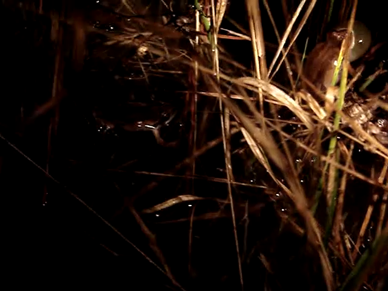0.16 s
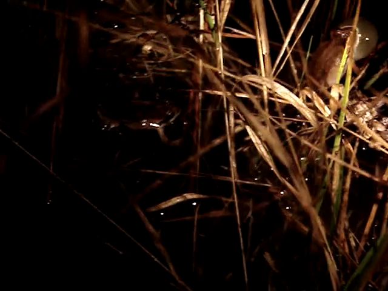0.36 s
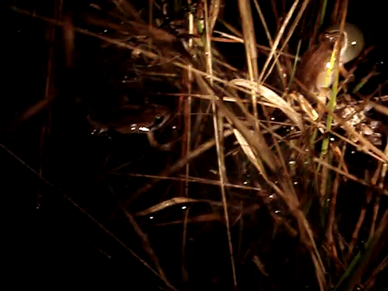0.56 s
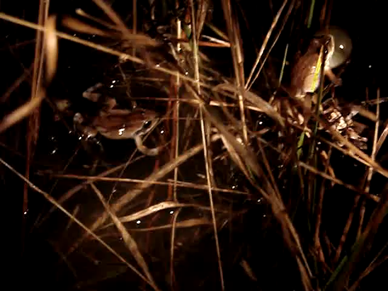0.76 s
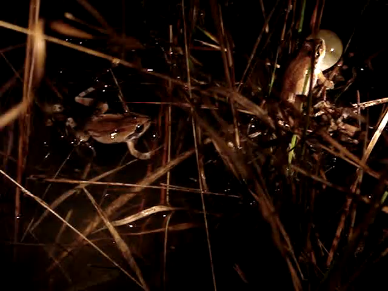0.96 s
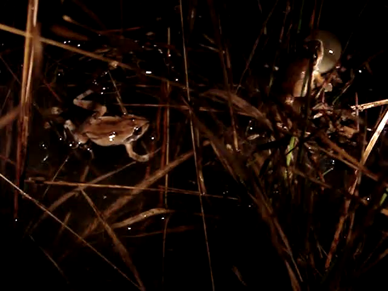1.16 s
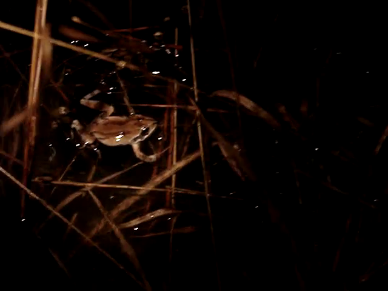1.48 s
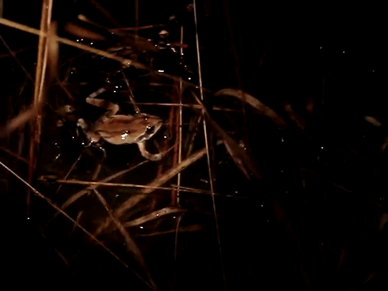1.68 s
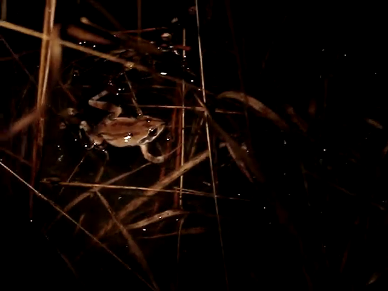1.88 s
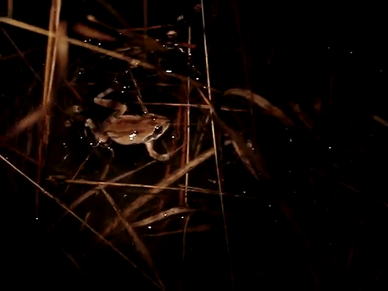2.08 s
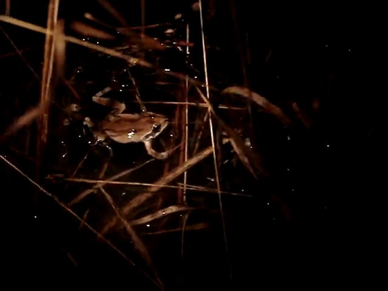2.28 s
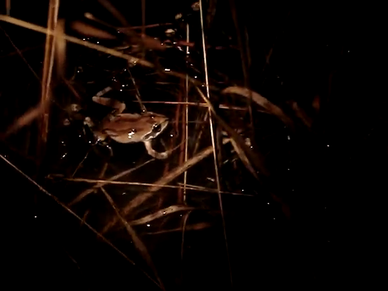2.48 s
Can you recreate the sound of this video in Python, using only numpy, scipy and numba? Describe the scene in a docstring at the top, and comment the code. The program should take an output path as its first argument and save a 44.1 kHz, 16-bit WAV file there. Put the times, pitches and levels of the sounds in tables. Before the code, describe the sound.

Small frogs peep close by in a night marsh. One gives a bright, rising peep at the start; another answers with a flat, pure peep at 0.3 seconds. From 0.3 to 0.9 seconds the nearest frog rattles a climbing trill with soft low thumps underneath. Then raspy clicks thicken and the two keep alternating, each about three times a second, until 2.6 seconds, over distant frogs and faint hiss.

```python
"""A night marsh full of small frogs, close to the microphone. It opens on a bright, rising peep over
clicks, far peeps, a faint patter of distant calls and hiss. At about 0.3 s a second near frog answers
with a flat, pure peep, and the nearest rattles a slow, climbing trill with low thumps under it.
The trill stops at 0.9 s; the clicks thicken again and the two near frogs trade peeps to the end."""
import sys
import numpy as np
from scipy import signal
from scipy.fft import rfft, irfft
from scipy.io import wavfile
from scipy.ndimage import uniform_filter1d, minimum_filter1d
from numba import njit

SR = 44100
rng = np.random.default_rng(int(sys.argv[2]) if len(sys.argv) > 2 else 0)


def digitize_waveform(pressure):
    """Quantize a signal to 16-bit integers and store it at the path in sys.argv[1].

    Rows of a 2-D input are taken as channels; values are limited to [-1, 1].
    """
    field = np.atleast_2d(pressure).T
    bounded = np.clip(field, -1, 1)
    quanta = np.round(bounded * 32767).astype(np.int16)
    wavfile.write(sys.argv[1], SR, quanta)


N = 116865

# the nearest frog's trill (time [s], level [dB], second harmonic [Hz], first harmonic trim [dB])
TRILL_PULSES = [(0.2683, -10.9, 2956, -17), (0.3149, -10.5, 3029, -16), (0.3718, -8.2, 3031, -19),
                (0.4345, -7.4, 3032, -22), (0.5, -6.4, 3084, -22), (0.5685, -6.5, 3138, -22),
                (0.6379, -6.9, 3138, -23), (0.7099, -6.0, 3190, -24), (0.7791, -7.6, 3236, -22),
                (0.8437, -7.5, 3268, -20), (0.9018, -7.2, 3337, -20)]
# timbre of a click, harmonics 1-7 (level [dB])
CLICK_VOICE = [2.5, .7, -23, -38, -45, -52, -57]
# timbre of a far peep, harmonics 1-7 (level [dB])
FAR_VOICE = [-27, 0, -27, -44, -52, -58, -62]
CLICK_SHAPE = dict(attack_s=.0016, release_s=.004, bend=.03, glide_s=.002,
                   sag_db=-5, bright_db=4, waver_db=1.8, rasp=.75)
FAR_SHAPE = dict(attack_s=.004, release_s=.005, bend=-.04, glide_s=.006,
                 sag_db=-.5, bright_db=2.5, waver_db=2.2, rasp=.5)


def rising_frog():
    """A near frog scoops up to pitch, with a bright edge on each peep."""
    # peeps (time [s], length [s], level [dB], second harmonic [Hz])
    notes = [(.0424, .0217, -8, 2786), (.4405, .0245, -8.5, 2779), (.8603, .0247, -11.8, 2770),
             (1.2275, .0246, -8, 2771), (1.553, .0247, -8, 2783), (1.8473, .0238, -7.7, 2781),
             (2.0961, .0219, -7.8, 2787), (2.427, .022, -8.5, 2774)]
    # timbre, harmonics 1-7 (level [dB])
    voice = [-25, 1.3, -23, -32, -35, -39, -47]
    shape = dict(attack_s=.0095, release_s=.007, bend=-.15, glide_s=.0036,
                 sag_db=-1.5, bright_db=22, waver_db=.8, rasp=.45)
    return peeps(notes, voice, shape)


def flat_frog():
    """A second near frog holds its pitch, almost a pure tone."""
    # peeps (time [s], length [s], level [dB], second harmonic [Hz])
    notes = [(.3025, .0225, -8, 2690), (.641, .0206, -13.2, 2687), (.972, .022, -10.3, 2681),
             (1.3238, .0226, -8.5, 2686), (1.658, .0221, -6.7, 2679), (1.9646, .0235, -7, 2678),
             (2.3633, .0245, -7.6, 2674), (2.6371, .02, -25, 2742)]
    # timbre, harmonics 1-7 (level [dB])
    voice = [-31, 1.2, -39, -46, -60, -64, -66]
    shape = dict(attack_s=.004, release_s=.006, bend=.005, glide_s=.003,
                 sag_db=-2.5, bright_db=8, waver_db=.6, rasp=.3)
    return peeps(notes, voice, shape)


def trilling_frog():
    """The nearest frog rattles out hard-edged pulses that climb in pitch."""
    # timbre, harmonics 1-7 (level [dB])
    voice = [8, 9, -15, -30, -38, -44, -47]
    shape = dict(attack_s=.0005, release_s=.004, bend=-.002, glide_s=.0012,
                 sag_db=-8, bright_db=8, waver_db=.7, rasp=.7)
    return pulses(TRILL_PULSES, voice, shape, length_s=.0066)


def trill_thumps(rise_s=.0002, snap_s=.0005, tail_s=.009, tail_share=.16):
    """A short, low thump with a slow return under each trill pulse."""
    # one thump per trill pulse (level [dB])
    strengths = [-60, -27, -20, -18, -17, -18, -18, -17, -19, -21, -28]
    out, t = np.zeros(N), np.arange(SR // 10) / SR
    recovery = (1 - tail_share) * np.exp(-t / snap_s) + tail_share * np.exp(-t / tail_s)
    dip = (1 - np.exp(-t / rise_s)) * recovery
    for pulse, db in zip(TRILL_PULSES, strengths):
        add(out, pulse[0], -undb(db) * dip)
    return out


def low_knocks():
    """Soft, lower knocks sit under the start of the trill."""
    # knocks (time [s], length [s], level [dB], second harmonic [Hz])
    notes = [(.2685, .009, -34, 2100), (.3, .009, -36, 2100), (.315, .009, -35, 2100)]
    # timbre, harmonics 1-7 (level [dB])
    voice = [0, -16, -30, -40, -50, -55, -60]
    return peeps(notes, voice, CLICK_SHAPE)


def frog_clicks():
    """Dry, raspy clicks: scattered frog calls, and the clicking onsets of three near peeps."""
    # clicks (time [s], level [dB], second harmonic [Hz], first harmonic trim [dB])
    clicks = [(0.0653, -21.9, 3026, -21), (0.0854, -12.6, 3183, -20), (0.1007, -9.7, 3216, -11),
              (0.1076, -22.3, 3212, -37), (0.1134, -28.0, 3013, -28), (0.1307, -29.0, 3208, -26),
              (0.1517, -24.1, 3149, -14), (0.1583, -24.2, 3237, -27), (0.1676, -13.0, 3240, -20),
              (0.1733, -20.5, 2958, -26), (0.1803, -17.7, 2890, -40), (0.1884, -20.2, 3193, -18),
              (0.1967, -9.0, 3294, -11), (0.202, -21.4, 3288, -20), (0.2142, -24.9, 2877, -26),
              (0.2262, -24.5, 3263, -25), (0.2388, -24.9, 3251, -25), (0.2468, -19.2, 3179, -19),
              (0.255, -12.8, 3270, -20), (0.3009, -8.3, 3370, -11), (0.3233, -28.3, 2856, -13),
              (0.3312, -27.1, 3248, -24), (0.3469, -21.8, 3208, -17), (0.3537, -14.9, 3324, -19),
              (0.3632, -27.1, 3250, -25), (0.3898, -26.1, 3001, -27), (0.418, -23.9, 3351, -22),
              (0.5339, -24.1, 2900, -33), (0.8345, -25.5, 2884, -33), (0.9102, -17.2, 3448, -17),
              (0.9705, -27.3, 2905, -16), (1.0586, -28.9, 2931, -22), (1.068, -28.7, 3198, -17),
              (1.1149, -22.5, 2998, -21), (1.1435, -22.9, 2938, -28), (1.1564, -24.3, 3284, -17),
              (1.1695, -29.8, 3196, -25), (1.1792, -19.4, 3017, -21), (1.217, -22.3, 3157, -20),
              (1.2517, -16.5, 3017, -16), (1.2671, -29.7, 2915, -21), (1.2767, -27.0, 2961, -11),
              (1.2885, -30.4, 3320, -16), (1.3, -16.7, 3269, -24), (1.3059, -25.7, 3018, -25),
              (1.3467, -29.1, 3106, -12), (1.3517, -29.4, 2923, -8), (1.3944, -16.3, 3254, -21),
              (1.4055, -25.2, 3182, -26), (1.4163, -12.4, 3178, -22), (1.4315, -28.1, 2936, -6),
              (1.4627, -21.2, 2867, -27), (1.4892, -25.4, 3144, -24), (1.4981, -14.7, 3309, -22),
              (1.5129, -11.3, 3205, -21), (1.524, -24.8, 2958, -10), (1.5337, -26.1, 3080, -20),
              (1.5441, -24.5, 2954, -37), (1.5966, -30.9, 2834, -34), (1.6039, -16.3, 3178, -15),
              (1.6154, -17.7, 3056, -15), (1.6326, -23.5, 3440, -13), (1.6368, -24.5, 3109, -25),
              (1.6479, -25.6, 2919, -26), (1.6556, -24.4, 2879, -18), (1.6928, -19.3, 3374, -18),
              (1.7041, -27.7, 3209, -19), (1.7118, -24.8, 3129, -17), (1.7163, -25.3, 3133, -10),
              (1.7214, -26.8, 3039, -21), (1.7489, -23.5, 3457, -20), (1.7618, -24.0, 3305, -21),
              (1.7724, -22.1, 2887, -32), (1.7978, -20.0, 3090, -32), (1.818, -30.8, 3256, -19),
              (1.8307, -30.4, 2949, -17), (1.8871, -19.7, 3173, -19), (1.8974, -22.7, 2961, -8),
              (1.9118, -28.3, 2960, -19), (1.931, -27.2, 3198, -20), (1.9501, -18.3, 3018, -8),
              (1.9641, -23.5, 2889, -13), (1.9965, -25.9, 3008, -22), (2.012, -14.0, 3077, -11),
              (2.022, -26.9, 3239, -17), (2.0299, -29.0, 3007, -18), (2.0558, -21.4, 2957, -25),
              (2.0739, -20.1, 3405, -19), (2.0822, -11.0, 3119, -11), (2.0963, -21.1, 3525, -20),
              (2.1212, -28.2, 2889, -18), (2.1482, -28.5, 3614, -12), (2.1603, -10.0, 3166, -12),
              (2.1717, -29.2, 3105, -27), (2.1773, -24.7, 3069, -18), (2.1923, -30.7, 3205, -26),
              (2.2012, -24.3, 3247, -20), (2.2126, -22.4, 3156, -29), (2.2173, -27.4, 3341, -18),
              (2.2328, -30.4, 3053, -26), (2.2484, -9.1, 3213, -11), (2.2648, -20.9, 3220, -21),
              (2.2793, -25.3, 3189, -21), (2.2842, -22.7, 3197, -16), (2.296, -25.1, 3140, -21),
              (2.3, -29.3, 2946, -27), (2.3054, -26.4, 2983, -19), (2.3408, -8.8, 3281, -11),
              (2.3578, -21.4, 3203, -15), (2.3904, -24.3, 3202, -22), (2.3949, -23.6, 2953, -30),
              (2.4571, -23.0, 3207, -16), (2.4641, -27.1, 3349, -19), (2.4829, -29.4, 3119, -18),
              (2.4939, -24.3, 3237, -19), (2.535, -25.6, 3251, -50), (2.5452, -10.7, 3443, -12),
              (2.575, -29.7, 3323, -20), (2.5828, -28.0, 3222, -20), (2.6044, -21.9, 3319, -22),
              (2.6129, -27.2, 3063, -23)]
    return pulses(clicks, CLICK_VOICE, CLICK_SHAPE, length_s=.0062)


def far_frogs():
    """Frogs further off give soft, wavering peeps."""
    # peeps (time [s], length [s], level [dB], second harmonic [Hz])
    notes = [(0.1699, 0.0216, -19.3, 2862), (0.2052, 0.018, -23.0, 2841), (0.2879, 0.0088, -24.1, 2749),
             (0.5251, 0.0198, -23.9, 2869), (0.5838, 0.0259, -34.0, 2676), (0.7231, 0.0232, -28.0, 2722),
             (0.8317, 0.0104, -24.5, 2842), (0.9136, 0.024, -36.4, 2669), (1.0154, 0.0274, -28.5, 2722),
             (1.0596, 0.0214, -29.5, 2745), (1.1334, 0.0219, -23.6, 2862), (1.25, 0.0096, -19.5, 2789),
             (1.2672, 0.0221, -27.7, 2714), (1.3079, 0.0078, -19.6, 2700), (1.4544, 0.0279, -19.4, 2846),
             (1.53, 0.018, -32.0, 2787), (1.5925, 0.01, -27.6, 2808), (1.6478, 0.0043, -21.9, 2731),
             (1.7001, 0.0229, -33.0, 2795), (1.761, 0.0226, -21.3, 2866), (1.8792, 0.0217, -23.6, 2766),
             (1.985, 0.0161, -21.0, 2726), (2.0392, 0.0238, -22.4, 2840), (2.1311, 0.0219, -31.6, 2769),
             (2.268, 0.0194, -19.2, 2694), (2.29, 0.019, -23.8, 2742), (2.3921, 0.0196, -22.7, 2819),
             (2.4151, 0.0139, -22.9, 2768), (2.55, 0.0242, -22.3, 2701)]
    return peeps(notes, FAR_VOICE, FAR_SHAPE)


def distant_patter(tick_s=.007, first_harmonic_trim_db=-19, peep_s=.021):
    """Many distant frogs tick and peep at random, blurring into a bed."""
    ticks = [(start, db, hz, first_harmonic_trim_db)
             for start, db, hz in crowd(per_s=300, db=-43.5, spread_db=4.5, hz=3200, spread_hz=260)]
    notes = [(start, peep_s, db, hz)
             for start, db, hz in crowd(per_s=40, db=-40, spread_db=3.5, hz=2790, spread_hz=110)]
    return pulses(ticks, CLICK_VOICE, CLICK_SHAPE, tick_s) + peeps(notes, FAR_VOICE, FAR_SHAPE)


def reed_echo(frogs, level_db=-19, t60_s=.03):
    """The reeds scatter the calls into a very short, diffuse tail."""
    t = np.arange(SR // 10) / SR
    tail = rng.standard_normal(len(t)) * undb(-60 * t / t60_s) * (t > .001)
    return undb(level_db) * signal.fftconvolve(frogs, tail / np.linalg.norm(tail))[:N]


def hiss(level_db=-57, flicker_db=2.5):
    """Faint background hiss whose level flickers."""
    # noise colour (frequency [Hz], level [dB])
    colour = [(25, 3), (60, -4), (150, -9), (500, -9), (1000, -7), (1600, -3), (2200, -3), (4500, -9),
              (7000, -17), (10000, -19)]
    band_hz, band_db = np.array(colour).T
    hz = np.maximum(np.arange(N // 2 + 1) * SR / N, 20)
    eq = undb(np.interp(np.log(hz), np.log(band_hz), band_db))
    noise = irfft(rfft(rng.standard_normal(N)) * eq, N)
    return noise / noise.std() * undb(level_db + flicker_db * drift(per_s=40))


def frog_note(length_s, db, hz, voice, attack_s, release_s, bend, glide_s,
              sag_db, bright_db, waver_db, rasp):
    """A harmonic note swells, glides onto pitch, wavers and dies away; its weak harmonics rasp (0-1)."""
    t = np.arange(int(length_s * SR)) / SR
    jitter = rng.standard_normal((8, 48))

    def wobble(row, per_s):
        return np.interp(t * per_s, np.arange(48), jitter[row])

    glide = 1 + bend * np.exp(-(t / glide_s) ** 2 / 2)  # bend: starting offset as a share of the pitch
    phase = 2 * np.pi * (np.cumsum(hz / 2 * glide) / SR + rng.random())  # hz is the second harmonic
    swell = np.sin(np.pi / 2 * np.clip(t / attack_s, 0, 1))
    release = np.clip((length_s - t) / release_s, 0, 1)
    tone = 0
    for k, harmonic_db in enumerate(voice, start=1):
        gain = undb(harmonic_db)
        if k != 2:
            rough = rasp if k > 2 else .7 * rasp
            gain = gain * (np.sqrt(1 - rough ** 2) + 1.2 * rough * wobble(k, per_s=900))
        if k > 2:  # the overtones flare at the onset
            gain = gain * undb(bright_db * np.exp(-t / glide_s / 2))
        tone = tone + gain * np.sin(k * phase)
    level_db = db + sag_db * t / length_s + waver_db * wobble(0, per_s=400)
    return swell * release * undb(level_db) * tone


def peeps(notes, voice, shape):
    """Play a list of notes in one voice."""
    out = np.zeros(N)
    for start, length_s, db, hz in notes:
        add(out, start, frog_note(length_s + .001, db, hz, voice, **shape))
    return out


def pulses(ticks, voice, shape, length_s):
    """Short ticks of the vocal sac, each with its own share of the first harmonic."""
    out = np.zeros(N)
    for start, db, hz, trim_db in ticks:
        tick_voice = [voice[0] + trim_db, *voice[1:]]
        add(out, start - shape["attack_s"] / 2, frog_note(length_s, db, hz, tick_voice, **shape))
    return out


def crowd(per_s, db, spread_db, hz, spread_hz):
    """Random calls (time [s], level [dB], second harmonic [Hz])."""
    count = int(per_s * N / SR)
    starts = rng.random(count) * N / SR + .005
    loudness, pitch = rng.standard_normal((count, 2)).T
    return zip(starts, db + spread_db * loudness, hz + spread_hz * pitch)


def drift(per_s):
    """Smooth random motion with a spread near 1."""
    hold = int(SR / per_s)
    steps = np.repeat(rng.standard_normal(N // hold + 1), hold)
    return 1.3 * uniform_filter1d(uniform_filter1d(steps, hold), hold)[:N]


def undb(db):
    """Decibels to amplitude."""
    return 10 ** (np.asarray(db) / 20)


def add(out, start, x):
    """Mix x into out at a time in seconds."""
    i = int(start * SR)
    out[i:i + len(x)] += x[:max(len(out) - i, 0)]


@njit
def follow_peaks(x, fall):
    """Peak follower: jumps up at once, falls slowly."""
    held, envelope = 0., np.empty(len(x))
    for i in range(len(x)):
        held = max(abs(x[i]), held * fall)
        envelope[i] = held
    return envelope


def limiter(x, threshold_db=-6.5, ratio=8, release_s=.018):
    """The gain ducks under the loudest calls."""
    peak = follow_peaks(x, float(np.exp(-1 / (release_s * SR))))
    gain = np.minimum(undb(threshold_db) / (peak + 1e-9), 1) ** (1 - 1 / ratio)
    return x * uniform_filter1d(minimum_filter1d(gain, size=17), size=17)


def scene():
    """The mono mix: frogs, their echo in the reeds, hiss and thumps."""
    frogs = (rising_frog() + flat_frog() + far_frogs() + trilling_frog()
             + frog_clicks() + distant_patter() + low_knocks())
    return (frogs + reed_echo(frogs) + hiss() + trill_thumps())[None]


def record(dry, open_s=.041, lopsidedness=.03, top_hz=9900):
    """Opens after a short hush; a limiter, a slightly lopsided microphone, no DC, a steep top cut."""
    fade_in = np.clip((np.arange(N) / SR - open_s) / .002, 1e-3, 1)
    x = limiter(dry[0] * fade_in)
    x = x - lopsidedness * x ** 2
    x = signal.sosfilt(signal.butter(1, 10, "high", fs=SR, output="sos"), x)
    return signal.sosfilt(signal.ellip(10, .2, 80, top_hz, fs=SR, output="sos"), x)[None]


dry = scene()
out = record(dry)
digitize_waveform(out)
```